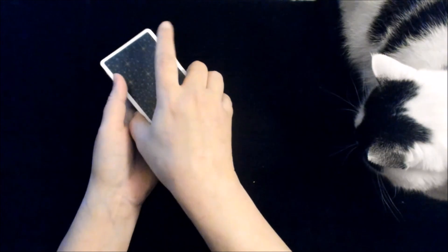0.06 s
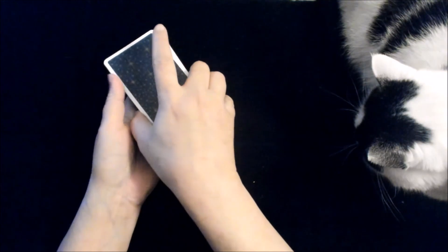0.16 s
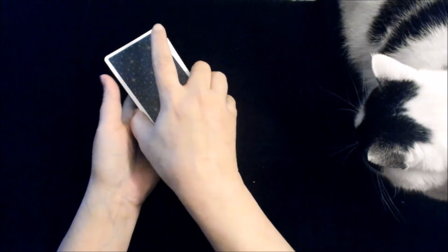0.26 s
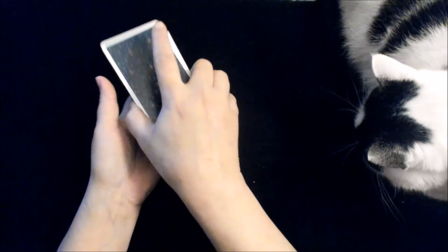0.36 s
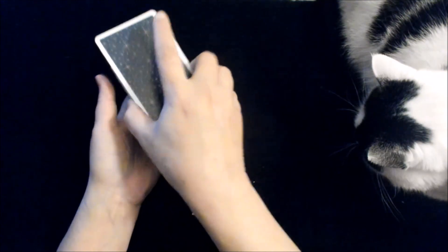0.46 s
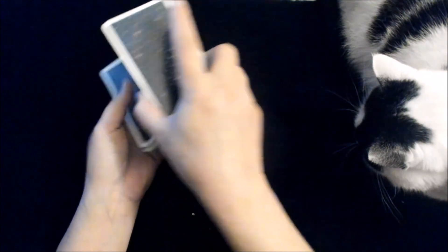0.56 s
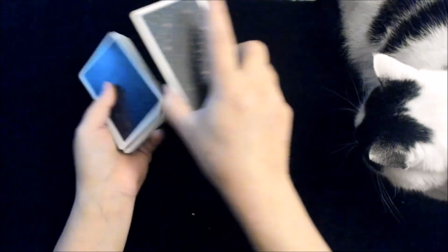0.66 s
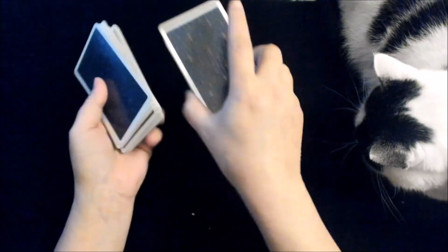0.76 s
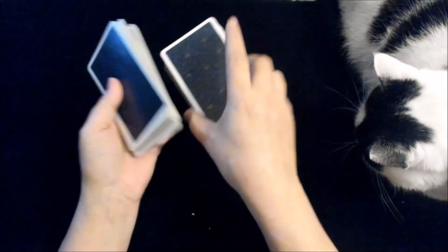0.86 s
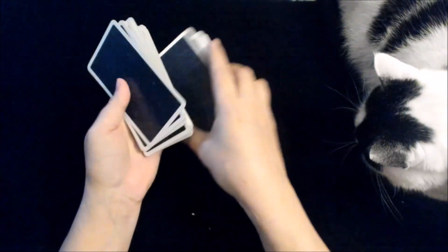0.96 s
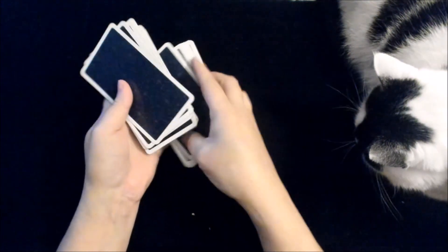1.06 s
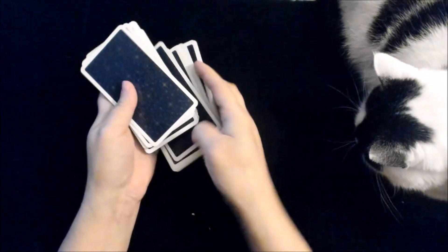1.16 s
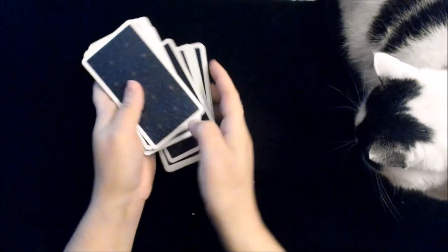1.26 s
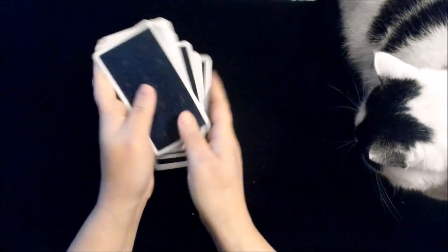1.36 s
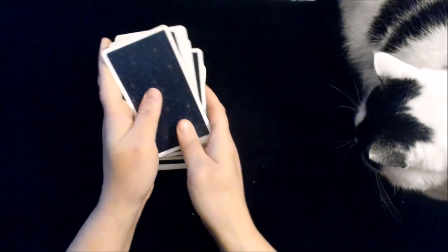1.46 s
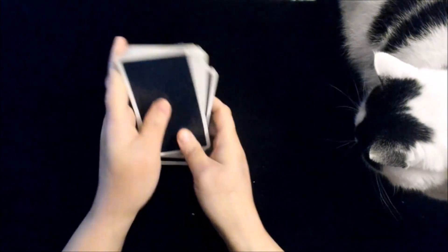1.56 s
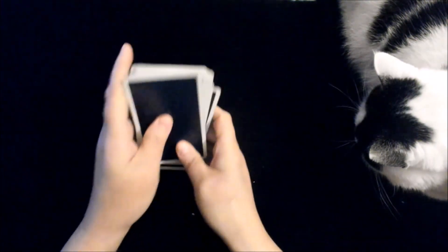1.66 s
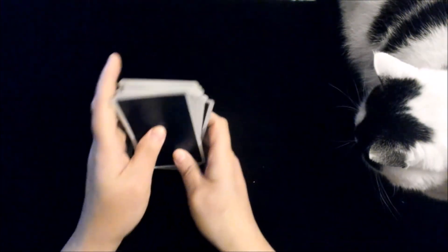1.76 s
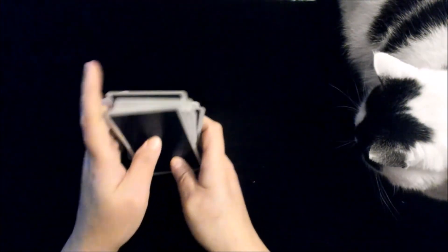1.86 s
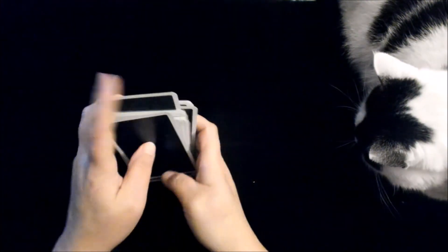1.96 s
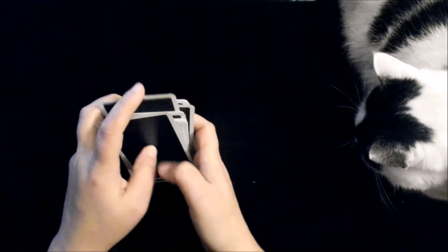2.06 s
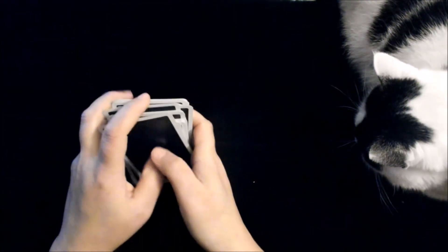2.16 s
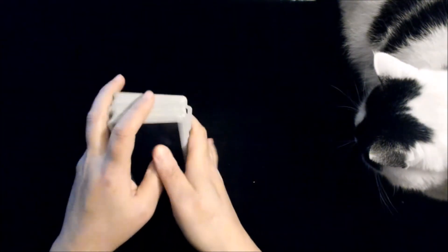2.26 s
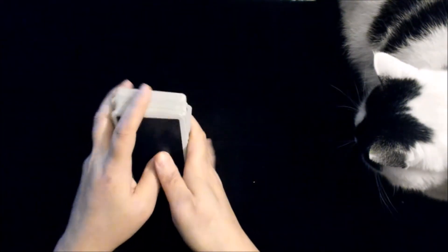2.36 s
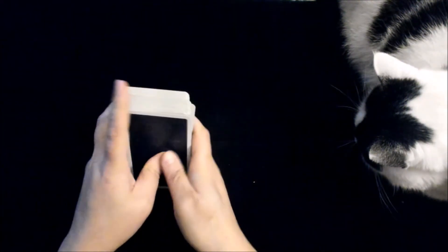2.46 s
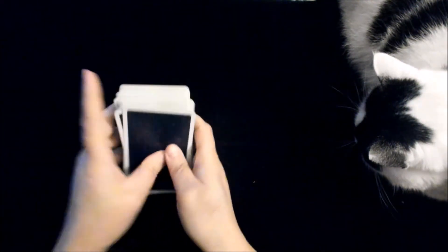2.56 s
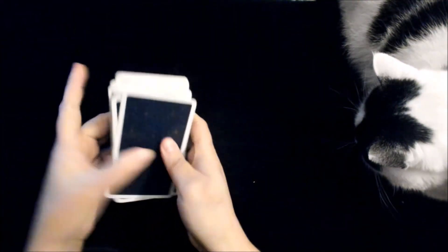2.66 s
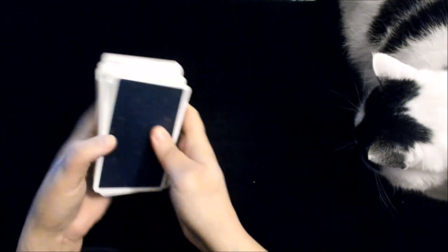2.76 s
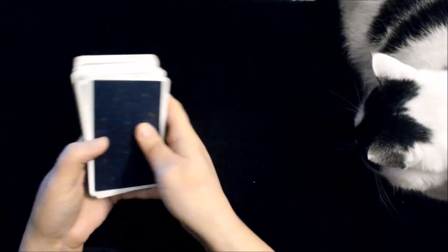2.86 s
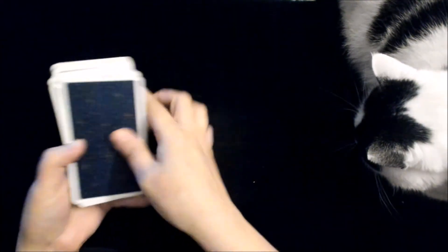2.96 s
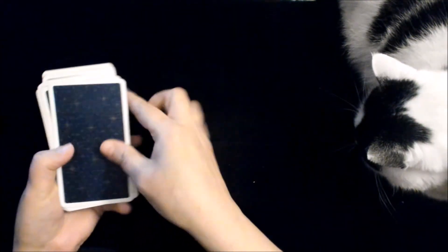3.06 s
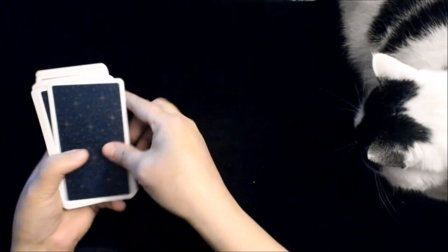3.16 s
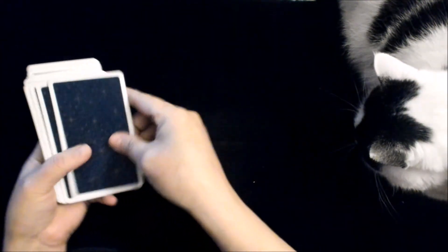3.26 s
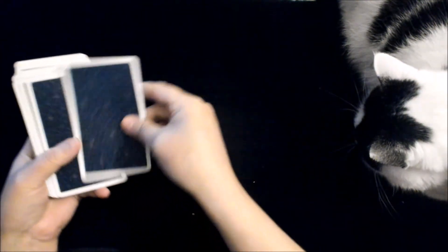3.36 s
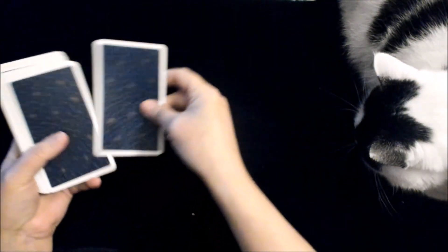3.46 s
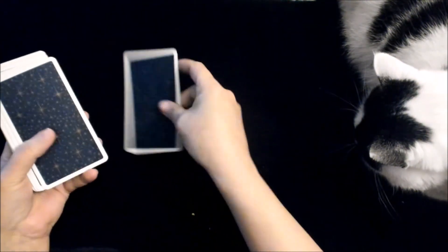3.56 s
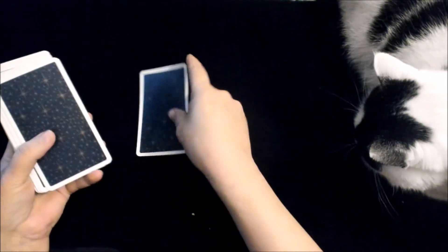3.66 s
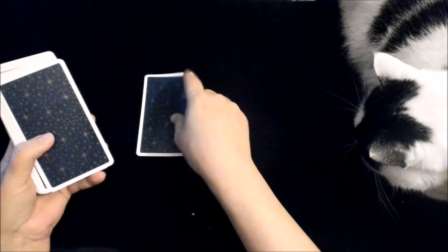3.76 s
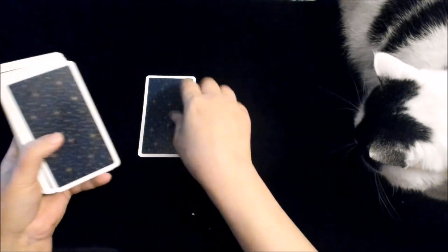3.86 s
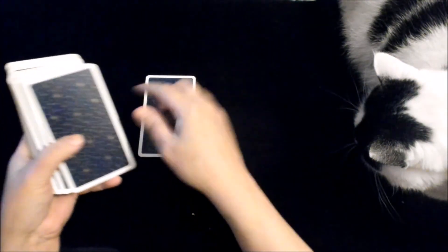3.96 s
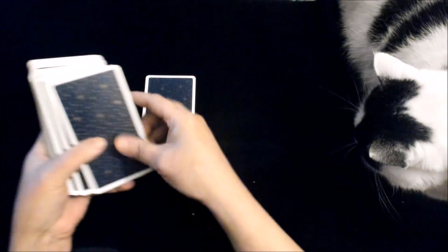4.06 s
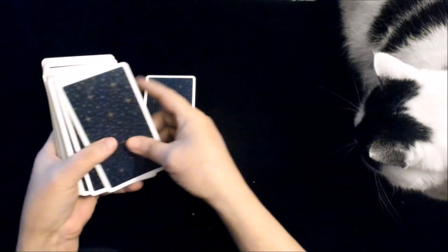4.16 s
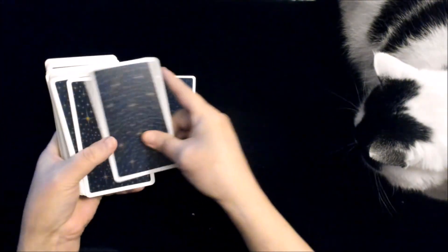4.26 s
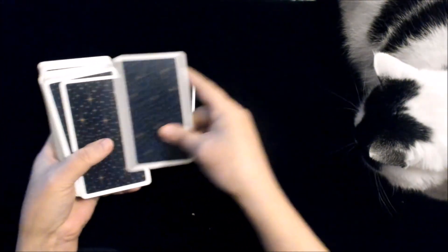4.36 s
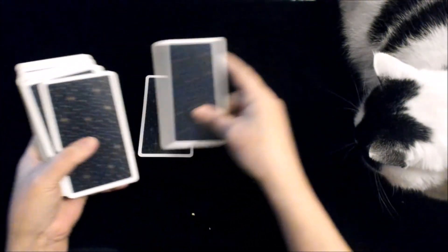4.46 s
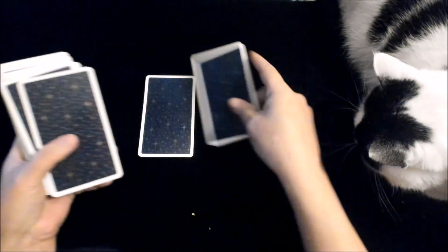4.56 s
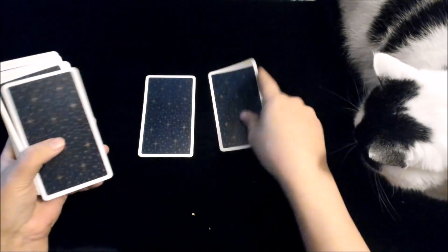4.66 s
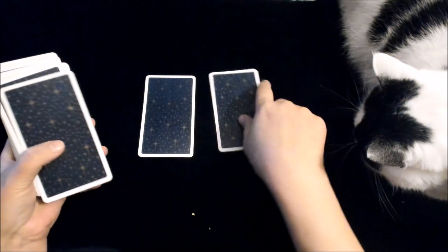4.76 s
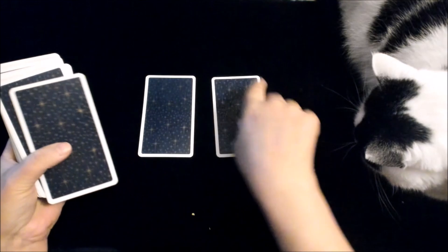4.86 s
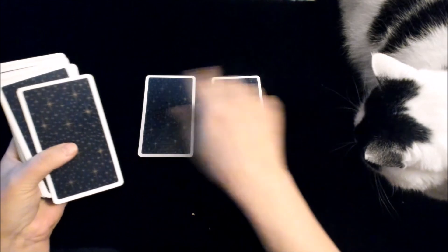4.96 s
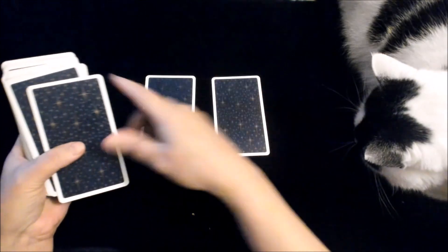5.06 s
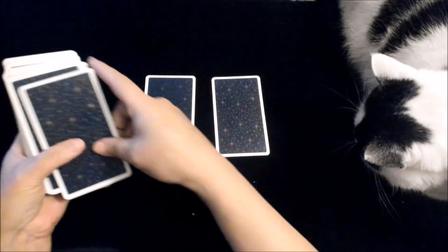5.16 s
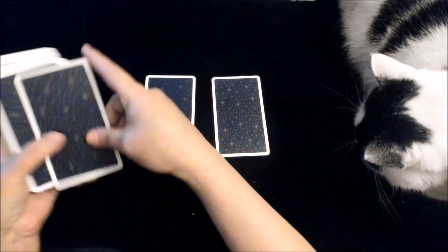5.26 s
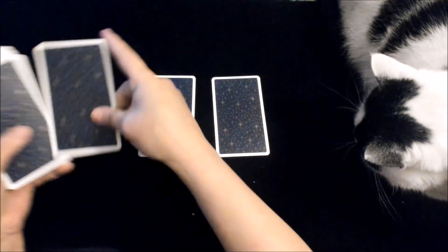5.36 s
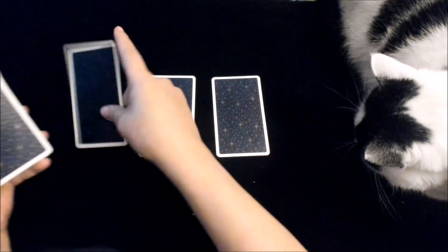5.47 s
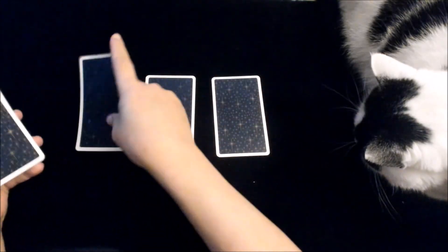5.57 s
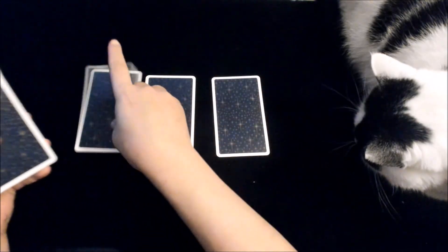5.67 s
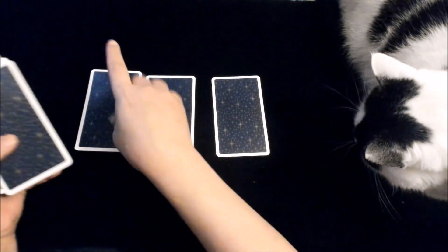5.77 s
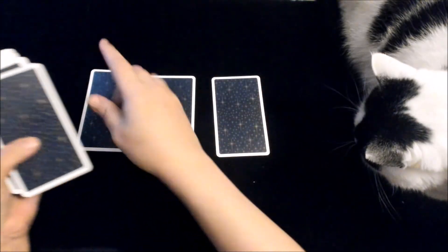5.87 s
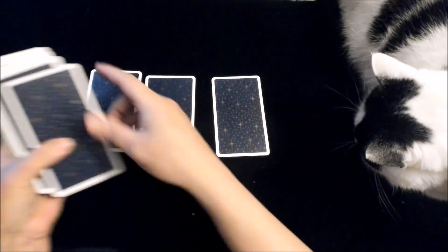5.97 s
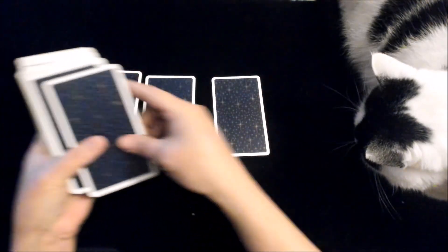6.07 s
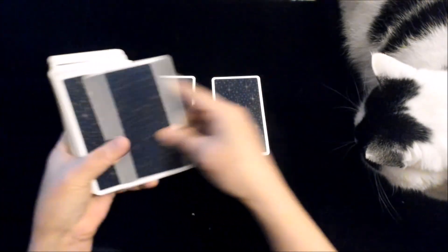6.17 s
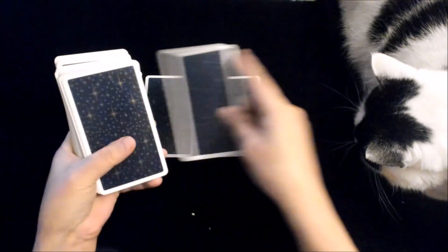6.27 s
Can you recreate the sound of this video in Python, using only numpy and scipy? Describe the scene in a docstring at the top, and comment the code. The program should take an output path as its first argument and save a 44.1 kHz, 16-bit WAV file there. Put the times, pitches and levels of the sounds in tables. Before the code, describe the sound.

Large playing cards are cut, pushed together and squared with papery rustles and soft table thumps, then dealt one by one with crisp snaps.

```python
"""Card deck on a cloth-covered table

Large cards are cut, pushed together and squared by hand, then dealt card by card, in a small room with a low hum.
Rubbing faces and card bodies are filtered friction noise, ticking edges are clicks with a little chatter, and each
bent card scrapes harder until it snaps free and rings. Hands and deck bump the table, a bank of decaying modes.
The stereo microphone is close and feels the table through its stand."""
import sys
import numpy as np
from scipy import signal
from scipy.fft import rfft, irfft
from scipy.io import wavfile

SR = 44100
rng = np.random.default_rng(int(sys.argv[2]) if len(sys.argv) > 2 else 0)


def unload_audio(sound):
    """Save the sound as a 16-bit wav file, at the path given as the first command line argument."""
    columns = np.transpose(np.atleast_2d(sound))
    # keep every value between -1 and 1, then stretch to whole-number steps
    steps = np.round(np.clip(columns, -1, 1) * 32767)
    wavfile.write(sys.argv[1], SR, steps.astype(np.int16))


N = 278271
T = np.arange(N) / SR


def amp(db):
    """Decibels to gain."""
    return 10 ** (np.asarray(db) / 20)


def unit(x):
    """Scales to rms 1."""
    return x / np.sqrt(np.mean(x ** 2) + 1e-20)


def read(points, hz):
    """Reads a table along log frequency."""
    point_hz, value = np.transpose(points)
    return np.interp(np.log(hz + 1), np.log(point_hz + 1), value)


def add(mix, start, sound):
    """Mixes a sound in at a start time in seconds, cut at the end of the scene."""
    part = mix[..., round(start * SR):][..., :sound.shape[-1]]
    part += sound[..., :part.shape[-1]]


def colour(x, spectrum):
    """Gives a steady signal a spectrum, at rms 1."""
    gain = amp(read(spectrum, np.fft.rfftfreq(N, 1 / SR)))
    return unit(irfft(rfft(x) * gain, N))


def ring(spectrum_db, size=2048):
    """Minimum-phase impulse response of energy 1 for a function from Hz to dB."""
    log_gain = np.log(amp(spectrum_db(abs(np.fft.fftfreq(size, 1 / SR)))))
    spectrum = np.exp(np.conj(signal.hilbert(log_gain)))
    response = np.fft.ifft(spectrum).real[:size // 2]
    return response / np.linalg.norm(response)


def drift(hz):
    """Random wander of rms 1, with little above the given rate."""
    return colour(rng.standard_normal(N), [(0, 0), (hz, 0), (2 * hz, -60)])


def treble(hz, low_hz=2500, high_hz=6000):
    """Shelf from 0 below low_hz to 1 above high_hz."""
    return read([(low_hz, 0), (high_hz, 1)], hz)


def friction(grains_per_s, spread_db, smooth):
    """Rubbing surfaces: tiny slips of uneven size over a smooth rub."""
    slips = (rng.random(N) < grains_per_s / SR) * rng.standard_normal(N)
    slips *= amp(spread_db * np.minimum(rng.exponential(1, N), 4))
    return unit(slips) + smooth * rng.standard_normal(N)


# spectrum of room air and microphone hiss: (frequency [Hz], relative level [dB])
AIR_COLOUR = [(20, -43), (33, -5), (48, -8.5), (62, -20.5), (96, -14), (150, -23), (270, -28.5),
              (450, -32.5), (700, -35.5), (950, -34.5), (1400, -43), (3000, -45), (9500, -49.5),
              (16000, -52)]
# how alike its two channels are: (frequency [Hz], likeness [0-1])
AIR_LIKENESS = [(60, 0), (130, 0), (300, 0.25), (1400, 0.3), (3000, 0.019), (7000, 0)]
# its stereo balance: (frequency [Hz], left minus right [dB])
AIR_BALANCE = [(60, 6.5), (150, 3), (380, 1), (800, 4), (2400, -1), (6000, -2), (15000, -4)]


def background(air_db=-50.5, hum_hz=31.4, hum_db=-42.5, waver_db=2.5, wander_rad=0.53, hum_right_db=-9):
    """Room air and microphone hiss as shaped noise, with a deep hum wavering in level and phase."""
    hz = np.fft.rfftfreq(N, 1 / SR)
    shared, separate = rfft(rng.standard_normal((2, N)))
    likeness = read(AIR_LIKENESS, hz)
    half_balance_db = read(AIR_BALANCE, hz) / 2
    left = shared * amp(half_balance_db)
    right = (likeness * shared + np.sqrt(1 - likeness ** 2) * separate) * amp(-half_balance_db)
    pair = np.array([left, right])
    air = amp(air_db) * unit(irfft(pair * amp(read(AIR_COLOUR, hz)), N))
    turn = 2 * np.pi * hum_hz * T + wander_rad * drift(hz=4.9)
    hum_level = np.sqrt(2) * amp(hum_db + waver_db * drift(hz=12.1))
    hum = hum_level * np.array([np.sin(turn), amp(hum_right_db) * np.sin(turn + 1.07)])
    return air + hum


# card edges and corners catching; at 3.458 and 5.372 s a dull echo of the snap just before:
# (time [s], relative level [dB], relative treble [dB])
TICKS = [(0.534, -46, -25), (0.661, -36.5, -17), (.919, -36.5, -26), (.966, -37.5, -44),
         (1.051, -29.5, -10), (1.428, -34, -29), (1.462, -30.5, -10), (1.721, -36, -34), (1.773, -40, -32),
         (1.898, -35.5, -22), (2.177, -38.5, -10), (2.672, -50, -8), (2.760, -41, -36), (3.139, -45, -34),
         (3.166, -40.5, -21), (3.458, -24, -40), (3.528, -37.5, -25), (4.032, -34.5, -17),
         (4.348, -29, -17), (4.535, -34, -48), (4.564, -35.5, -42), (5.083, -28.5, -17), (5.159, -34.5, -9),
         (5.332, -33, -20), (5.372, -25, -43), (5.983, -34, -16), (6.131, -35.5, -26)]
# common colour of the ticks: (frequency [Hz], relative level [dB])
TICK_COLOUR = [(200, 0), (600, -6), (1800, -5.5), (2800, -15), (5000, 6.5), (9000, -2), (16000, -7)]


def ticks(level_db=12, chatter=0.5, settle_s=0.0024, treble_db=4, size=512):
    """An edge slipping off its neighbour, or a snap's dull echo: a click and a little dying chatter."""
    out, t = np.zeros(N), np.arange(size) / SR
    for start, db, bright_db in TICKS:
        force = (t == 0) + chatter * rng.standard_normal(size) * np.exp(-t / settle_s)
        edge = ring(lambda hz: read(TICK_COLOUR, hz) + (bright_db + treble_db) * treble(hz))
        click = signal.fftconvolve(force, edge)
        add(out, start, amp(db + level_db) * click / np.linalg.norm(click))
    return out


# hands and deck bump the table; a resting hand damps it:
# (time [s], relative level [dB], hardness above the boom [dB/octave], ring time [factor])
BUMPS = [(0.656, -46, -5, 0.61), (.955, -36, -18, 0.79), (1.063, -31, -20, 0.46),
         (1.605, -21.5, -14.5, 0.61), (1.811, -37, -12, 0.63), (1.899, -20.5, 2.5, 0.76),
         (1.966, -14, -31, 0.19), (2.065, -25.5, -12.5, 0.91), (2.133, -27.5, -16, 1), (2.170, -23, -2, 1),
         (2.390, -59.5, 9.5, 0.93), (3.138, -54, -2, 0.84), (3.448, -52.5, -11, 0.88),
         (3.721, -27.5, 1, 0.57), (4.340, -43.5, -10, 0.48), (4.604, -32, -4, 0.55), (4.712, -33, -2, 0.66),
         (5.366, -47.5, 8, 1), (5.428, -38.5, -7.5, 0.6), (5.593, -31.5, 5.5, 0.32),
         (6.124, -50, 6.5, 0.77)]
# modes of table and stand:
# (frequency [Hz], relative level [dB], undamped 60 dB decay time [s], right-channel phase [rad])
TABLE_MODES = [(27.24, -2.5, 1, 3), (64.6, -2, 0.45, 3), (89.2, 0.5, 0.91, 2.5), (98.6, 1.5, 0.21, 5),
               (117.1, -7, 0.68, 3.5), (147, -8, 0.081, 5), (184.3, 6, 0.15, 3), (204.4, 5, 0.078, 4),
               (243, -9.5, 0.3, 2.7), (354, -10.5, 0.084, 1.36), (426, -13, 0.076, 1.4),
               (590, -30.5, 0.15, -2)]


def table(level_db=5, right_db=-5, swell_cycles=0.83, boom_hz=95, boom_lag_s=0.01245):
    """Each bump rings the table; bending waves carry the high modes first and the low boom follows."""
    out, t = np.zeros((2, N)), np.arange(SR) / SR
    for start, db, hardness_db, ring_factor in BUMPS:
        for hz, mode_db, t60, phase in TABLE_MODES:
            above = max(hz / boom_hz, 1)
            gain_db = level_db + db + mode_db + hardness_db * np.log2(above)
            decay = amp(gain_db - 60 * t / (t60 * ring_factor))
            envelope = decay * (1 - np.exp(-t * hz / swell_cycles))
            turn = 2 * np.pi * hz * t
            pair = np.array([np.sin(turn), amp(right_db) * np.sin(turn + phase)])
            add(out, start + boom_lag_s / above ** 2, envelope * pair)
    return out


def stroke(start, hold, attack_s=0.016, release_s=0.015):
    """A hand's stroke gathers speed, holds it and comes to rest, with exponential flanks."""
    before = np.maximum(start - T, 0)
    after = np.maximum(T - start - hold, 0)
    return np.exp(-before / attack_s - after / release_s)


# strokes of card over card; the deck is cut and pushed together, squared from 1.76 s, dealt from 3.1 s:
# (start [s], hold [s], relative hiss of the faces [dB], relative rasp of the card bodies [dB])
SLIDES = [ (0.662, .012, -59.5, -60), (0.812, .06, -62, -61), (.92, 0.037, -57.5, -56.5),
          (1.028, 0.043, -54, -55), (1.426, 0.074, -47, -67), (1.592, 0.025, -52, -50),
          (1.764, 0.31, -57.5, -62), (2.146, 0.039, -49, -54.5), (2.219, 0.15, -59, -60.5),
          (2.418, 0.037, -56, -53.5), (2.539, 0.016, -54.5, -51), (2.721, 0.012, -57, -57),
          (2.797, 0.11, -59, -69), (2.904, 0.03, -43.5, -51), (3.114, 0.012, -56, -58),
          (3.208, .05, -58, -58.5), (3.343, 0.086, -58, -63), (3.41, 0.057, -61, -43.5),
          (3.529, .015, -55, -60), (3.634, 0.034, -62, -57.5), (4.019, 0.016, -58.5, -49),
          (4.14, 0.073, -53, -57), (4.263, 0.074, -46.5, -61), (4.429, 0.0091, -52.5, -50),
          (4.605, 0.084, -64, -54), (5.198, 0.094, -48.5, -70), (5.3, 0.053, -57.5, -47),
          (5.72, .22, -78, -66), (5.974, 0.039, -58.5, -57.5), (6.059, 0.025, -52.5, -59),
          (6.134, 0.036, -50, -43)]
# the loose deck shifts in the hands from 0.66 to 3.41 s, same columns as SLIDES
HANDLING = (.66, 2.75, -66, -66)
# hiss of the card faces: (frequency [Hz], relative level [dB])
HISS = [(1200, -8), (2500, -4.5), (4000, -3.5), (6000, -1), (9500, -3.5), (12000, -6), (16000, -5.5)]
# rasp of the card bodies: (frequency [Hz], relative level [dB])
RASP = [(150, -2), (300, -2), (550, -5), (800, -1.5), (1200, -4.5), (1700, -6), (2400, -9), (3200, -9.5),
        (5000, -23), (9000, -55)]


def sliding(rasp_db=-4.5, flutter_db=1.5):
    """Faces hiss and card bodies rasp with every stroke; finger pressure flutters both."""
    power = np.zeros((2, N))
    for start, hold, face_db, body_db in SLIDES + [HANDLING]:
        speed = np.maximum(stroke(start, hold), 1e-6)
        power += (amp([[face_db], [body_db]]) * speed) ** 2
    face_level, body_level = np.sqrt(power)
    hiss = colour(friction(grains_per_s=6600, spread_db=1.5, smooth=1.0), HISS) * face_level
    rasp = colour(friction(grains_per_s=1800, spread_db=3.0, smooth=0.52), RASP) * amp(rasp_db) * body_level
    return (hiss + rasp) * amp(flutter_db * drift(hz=71.5))


# quick scuffs, shrill or dull; at 5.39 and 6.177 s the snapped card rings on;
# rise and fall are exponential time constants:
# (peak time [s], relative level [dB], rise [s], fall [s], centre frequency [Hz], relative width [octaves])
SCUFFS = [(.765, -63.5, 0.047, .025, 1790, 0.38), (.858, -53, .008, .018, 2800, 1.4),
          (.93, -55, .008, 0.008, 1780, 0.24), (1.052, -54, .02, 0.026, 2110, 0.43),
          (1.29, -39.5, .019, 0.016, 2520, 1.75), (1.362, -46, 0.0034, .006, 1240, 0.58),
          (1.423, -43.5, .0055, 0.018, 1300, 0.93), (1.455, -38.5, 0.0079, 0.0074, 970, 0.51),
          (2.551, -53.5, 0.022, 0.01, 4830, 0.4), (2.897, -33.5, 0.0041, 0.014, 10500, 0.46),
          (2.925, -41, 0.015, 0.0079, 9400, 0.16), (3.14, -50, 0.0022, .012, 440, 0.28),
          (3.525, -51, .022, 0.031, 1290, 0.75), (4.345, -39.5, 0.015, 0.015, 1360, 1.07),
          (4.44, -55, .012, 0.009, 1700, 0.84), (4.545, -49.5, .007, .017, 895, .56),
          (4.625, -48, 0.026, .029, 2110, 0.8), (5.39, -46.5, 0.0098, 0.04, 940, 0.56),
          (5.555, -51.5, 0.018, 0.022, 2100, 0.21), (6.177, -42, 0.0035, .007, 3950, .2)]


def scuffs(skirt_db=-16, size=16384):
    """A short burst of slips swells and dies in one band, narrow or broad by event."""
    out, t = np.zeros(N), (np.arange(size) - size // 2) / SR
    slips = unit(friction(grains_per_s=2400, spread_db=-4.0, smooth=0.43))
    for peak, db, rise, fall, centre_hz, octaves in SCUFFS:
        swell = np.exp(-abs(t) / np.where(t < 0, rise, fall))
        burst = np.roll(slips, -round(peak * SR))[:size] * swell
        band = ring(lambda hz: skirt_db * np.log1p((np.log2((hz + 1) / centre_hz) / (2 * octaves)) ** 2))
        add(out, peak + t[0], amp(db) * signal.fftconvolve(burst, band))
    return out


# a bent card or packet drags over an edge and snaps free; drag and build-up are exponential time constants:
# (time [s], relative level [dB], ring frequency [Hz], treble above the ring [dB], body below 790 Hz [dB],
#  drag [s], build-up [s], share of clean crack [0-1])
SNAPS = [(1.2342, -30, 2500, 7.5, -17, .003, 0.0048, 0), (1.418, -28, 1720, -1.5, -8, .003, .0025, 0.15),
         (3.4491, -23, 1444, -8, -3, 0.025, 0.00042, 0.77), (3.720, -23, 3720, -7, -2, 0.032, 0.0028, 0.5),
         (4.707, -20.5, 2690, -6.5, -1.5, 0.027, 0.0034, 0.42),
         (5.364, -24.5, 2100, -8.5, -1, 0.018, 0.0018, 0.6),
         (5.586, -22.5, 2530, -4, 0, 0.036, 0.0052, 0.02),
         (6.1767, -24.5, 3950, -3.5, -4.5, .018, 0.0039, 0.05)]
# common colour of the snapping cards: (frequency [Hz], relative level [dB])
SNAP_COLOUR = [(120, -6), (300, 0.5), (600, 2), (900, 0), (1250, 1.5), (1800, -2), (2400, -1), (3100, -4),
               (5000, -6), (9000, -11), (16000, -24.5)]


def snaps(level_db=19, rub_db=-25, hiss_db=-29, rub_settle_s=0.041, snap_settle_s=0.002,
          ring_db=5, ring_width=0.083, knee=1.37, size=16384):
    """The edge rubs, scrapes ever harder and lets go with a crack; the card rings, its treble shelved above."""
    out, t = np.zeros(N), (np.arange(size) - size // 2) / SR
    for release, db, ring_hz, treble_db, body_db, drag, build, clean in SNAPS:
        scrape, rub, hiss = rng.standard_normal((3, size))
        scrape *= np.exp(-abs(t) / np.where(t < 0, build, snap_settle_s))
        contact = np.exp(-abs(t) / np.where(t < 0, drag, rub_settle_s))
        # the clean crack is a single impulse at the moment of release
        force = np.sqrt(1 - clean) * scrape / np.linalg.norm(scrape) - np.sqrt(clean) * (t == 0)

        def card_db(hz):
            """The card's colour: treble shelf, body shelf and a ringing peak."""
            shelves = treble_db * treble(hz, ring_hz, ring_hz * knee) + body_db * (1 - treble(hz, 790, 910))
            peak = ring_db / (1 + ((hz / ring_hz - 1) / ring_width) ** 2)
            return read(SNAP_COLOUR, hz) + shelves + peak

        card = ring(card_db)
        face = ring(lambda hz: read(HISS, hz))
        snap = signal.fftconvolve(force, card)
        snap *= amp(level_db) / np.linalg.norm(snap)
        rub = amp(rub_db) * signal.fftconvolve(rub * contact, card)
        hiss = amp(hiss_db) * signal.fftconvolve(hiss * contact, face)
        add(out, release + t[0], amp(db) * (snap + rub + hiss))
    return out


# decay of the small room: (frequency [Hz], 60 dB decay time [s])
ROOM_DECAY = [(200, 0.32), (1000, 0.19), (3000, 0.26), (8000, 0.21), (16000, 0.1)]
# nearby surfaces: (delay before random shift [s], level before the side gains [dB])
ECHOES = [(.0018, -16.5), (.0031, -31), (.008, -14.5), (0.0115, -16)]


def room(x, wet_db=-6, left_db=1.02, right_db=-7.5, left_lag_s=.00002, size=22050):
    """Direct sound stronger on the left, echoes off nearby surfaces, and a short diffuse tail."""
    hz, t, noise = signal.stft(rng.standard_normal((2, size)), SR, nperseg=256)
    decay = amp(-60 * t / read(ROOM_DECAY, hz)[:, None])
    tail = signal.istft(noise * decay, SR, nperseg=256)[1][:, :size]
    tail *= np.minimum(np.arange(size) / SR / 0.0014, 1)  # fades in over 1.4 ms
    response = amp(wet_db) * tail / np.linalg.norm(tail, axis=1, keepdims=True) * amp([[0], [-2]])
    for side, (gain_db, lag) in enumerate([(left_db, left_lag_s), (right_db, 0)]):
        paths = [(0.00034, 0.0098)]  # the direct path (delay [s], level [dB])
        paths += [(delay + rng.uniform(-0.00028, 0.00036), db) for delay, db in ECHOES]
        for delay, db in paths:
            response[side] += amp(gain_db + db) * np.sinc(np.arange(size) - (delay + lag) * SR)
    return signal.fftconvolve(x[None], response, axes=1)[:, :N]


# where the cards are worked, added to the room's own balance: (time [s], shift to the left [dB])
PLACE = [(0, 4), (1.4, -2.5), (2.9, -2), (3.45, -1.5), (3.72, -3), (4.3, -2), (4.71, -2), (5.36, -2),
         (5.6, -2), (6.18, -1.5)]


def scene():
    """Cards in the room, the table through the stand, and the background."""
    half_shift_db = np.interp(T, *np.transpose(PLACE)) / 2
    cards = room(ticks() + sliding() + scuffs() + snaps())
    return background() + table() + cards * amp([half_shift_db, -half_shift_db])


def record(dry):
    """The recorder's band limit: a linear-phase low-pass at 15.9 kHz."""
    lowpass = signal.firwin(511, 15900, window=("kaiser", 9), fs=SR)
    return signal.oaconvolve(dry, lowpass[None], "same")


dry = scene()
out = record(dry)
unload_audio(out)
```